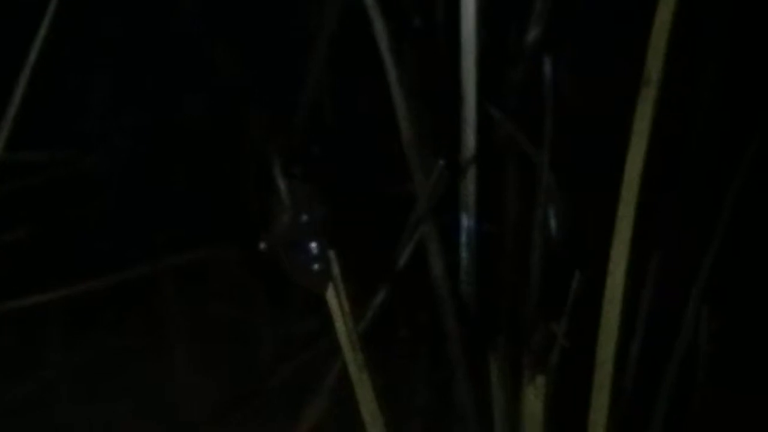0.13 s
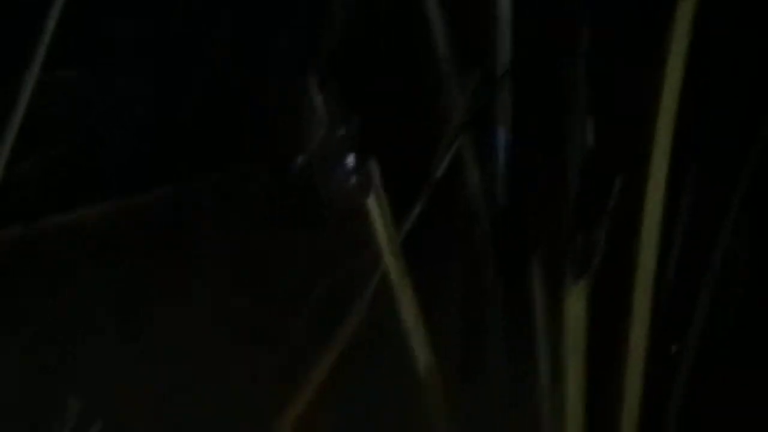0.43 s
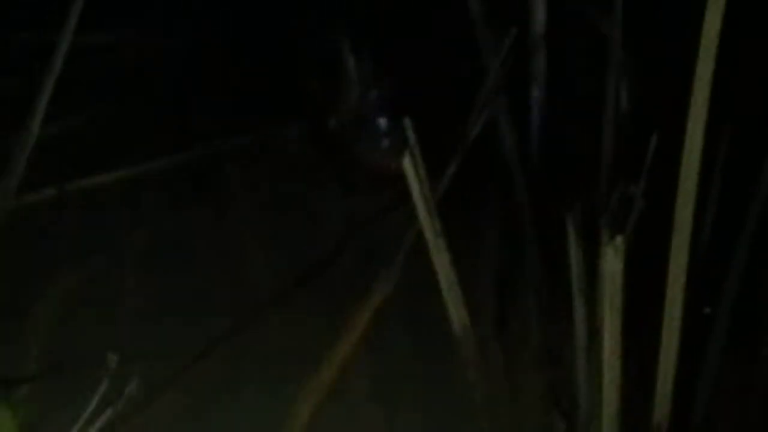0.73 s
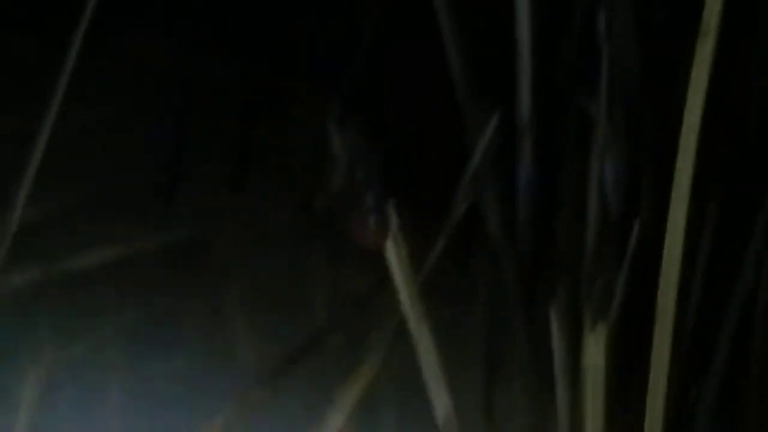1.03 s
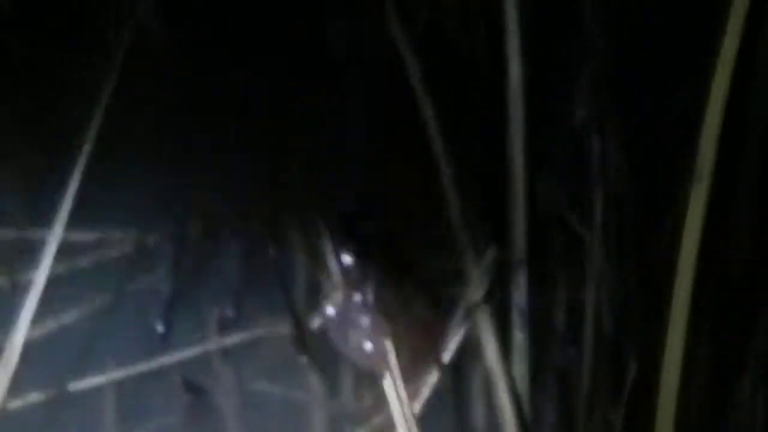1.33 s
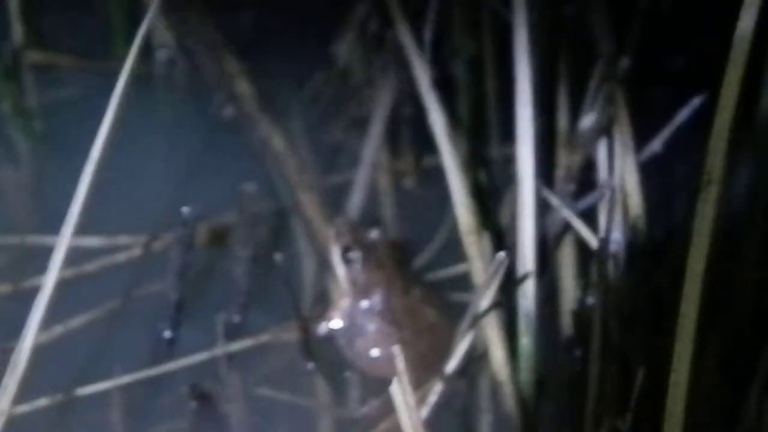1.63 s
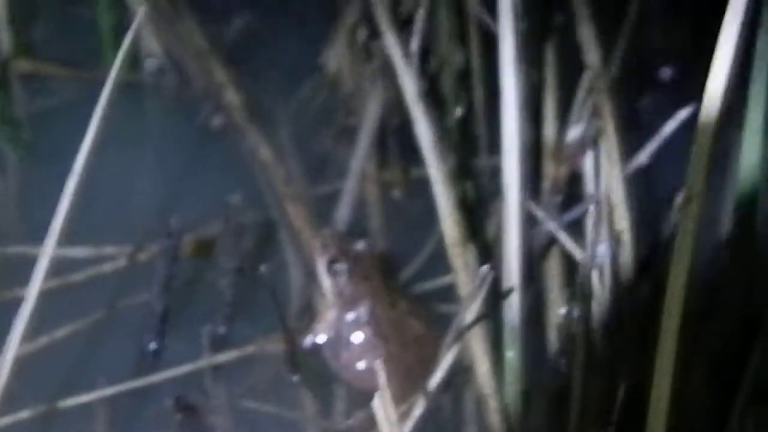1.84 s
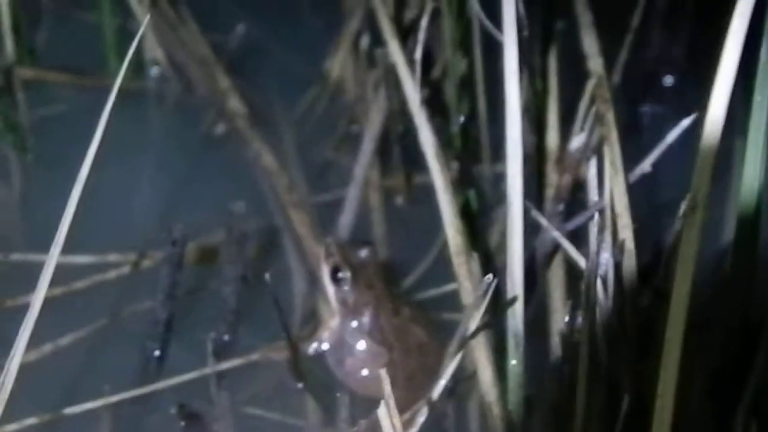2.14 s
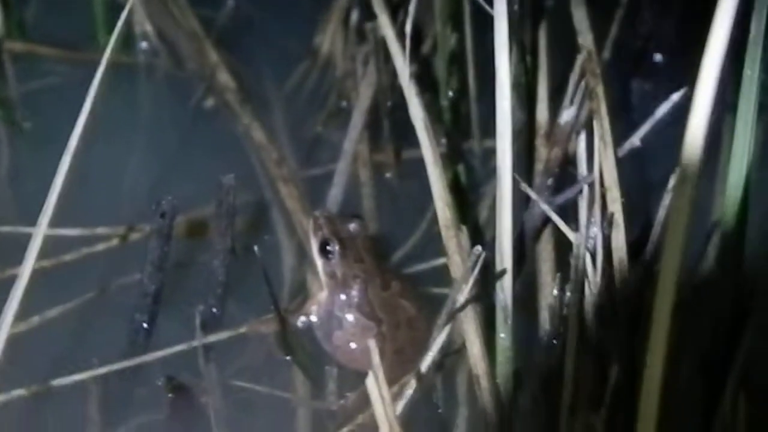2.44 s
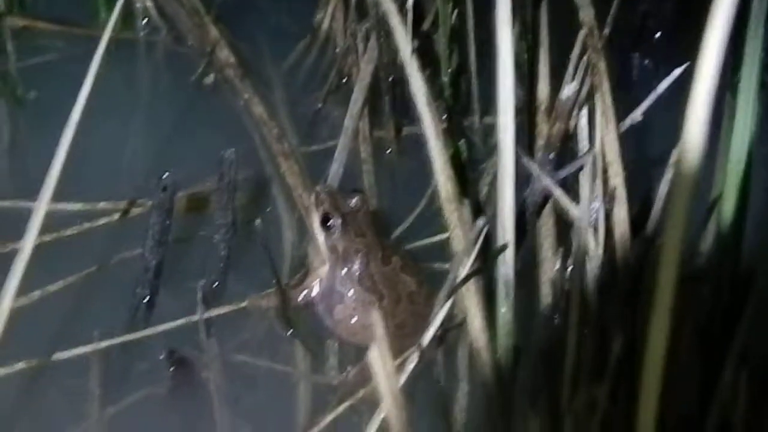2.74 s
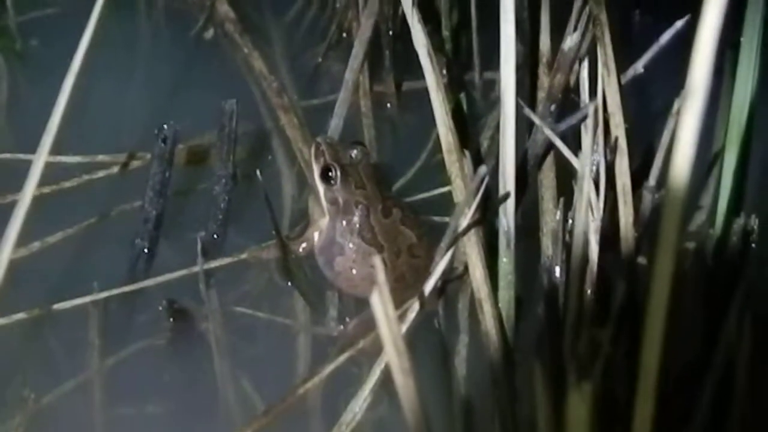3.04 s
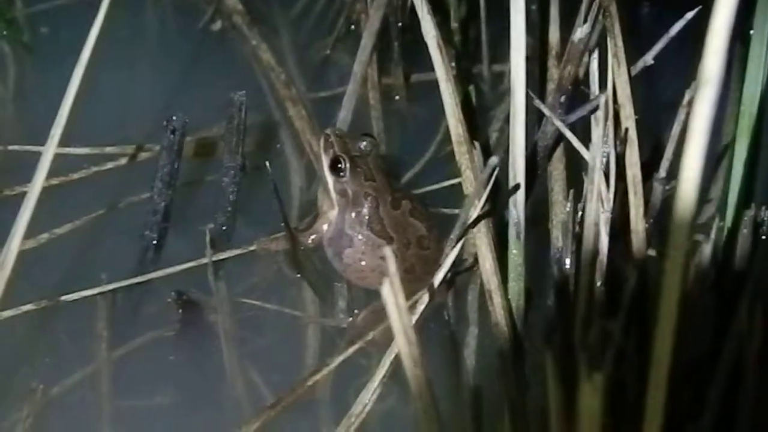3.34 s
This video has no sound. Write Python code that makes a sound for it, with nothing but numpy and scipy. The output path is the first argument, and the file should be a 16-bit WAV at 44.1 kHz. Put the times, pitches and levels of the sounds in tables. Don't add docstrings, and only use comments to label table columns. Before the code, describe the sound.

Close frogs trade rising, ratchet-like creaks at a night pond, with far calls and thin cricket chirring

```python
import sys
import numpy as np
from scipy import signal
from scipy.fft import rfft, irfft
from scipy.io import wavfile
from scipy.ndimage import uniform_filter1d

SR = 44100
rng = np.random.default_rng(int(sys.argv[2]) if len(sys.argv) > 2 else 0)


def volts_from_db(level):
    exponent = np.asarray(level, float) / 20
    return 10 ** exponent


def to_wav(s):
    ch = np.atleast_2d(s).T
    pcm = np.round(np.clip(ch, -1, 1) * 32767)
    wavfile.write(sys.argv[1], SR, pcm.astype(np.int16))


N = 153027

# [f/Hz, level/dB]
HUM_MID = [(22, -49), (50, -11), (91, 0), (147, -3.5), (257, -16), (302, -14.5), (409, -5.5), (704, -20.5),
           (1100, -24)]
HUM_SIDE = [(13, -40), (22, -23), (97, 4), (274, -5.5), (402, 2.5), (600, -4.5), (1000, -9), (1300, -40),
            (2200, -120)]
HISS_MID = [(800, -11.5), (1300, 2), (1800, -5.5), (2150, -2.5), (3500, -6), (3900, -8), (5300, -19),
            (15700, -26)]
HISS_SIDE = [(800, -11), (1300, -3), (1800, -5), (3300, -5.5), (3900, -11.5), (5300, -15), (8000, -20),
             (15700, -23)]
# [f/Hz, width/Hz, level/dB]
TONES = [
    (95.85, 4.4, -55.5),
    (414.9, 7.8, -59.5),
    (561.7, 6.7, -68.5),
    (15735, 3.6, -89),
]
# [t/s, delay/ms]
CHIRP_DRIFT = [(.4, 15.6), (.8, 15.2), (1.201, 19), (1.6, 12.2), (2.0, 14.4), (2.4, 16.8), (2.8, 17.7),
               (3.2, 22)]
# [t/s, level/dB]
CROWD_SWELL = [(.1, -7), (.4, -3.5), (.7, 0.5), (1.05, -2.5), (1.4, -0.5), (1.8, -2.5), (2.2, 1),
               (2.6, -3.5), (3.0, 0.5), (3.4, -4)]
# [t/s, length/s, start f/Hz, end f/Hz, level/dB]
FAR_CALLS = [(0.102, 0.27, 2430, 2520, -55), (0.098, 0.17, 2930, 3150, -71), (0.263, .3, 2690, 2910, -49.5),
             (.78, .2, 3060, 3260, -46.5), (0.993, 0.11, 2580, 2775, -45), (0.968, .25, 3210, 2985, -49),
             (1.534, .3, 2375, 2540, -51), (1.55, .24, 2590, 2890, -52), (1.78, 0.29, 2800, 3250, -55.5),
             (2.44, 0.17, 2940, 3254, -47), (2.473, 0.17, 2800, 2990, -40), (2.65, 0.21, 2870, 3270, -55),
             (2.893, .2, 2690, 2800, -46), (3.059, .14, 2734, 2760, -52.5), (3.2, 0.23, 2950, 3150, -55),
             (3.33, 0.13, 2740, 2840, -53)]
# [t/s, length/s, start f/Hz, end f/Hz, level/dB]
WHISTLES = [
    (.79, 0.1405, 3060, 3230, -42),
    (2.455, 0.18, 2940, 3250, -45.5),
    (2.66, .15, 2950, 3200, -44.5),
    (.27, .2, 2900, 2920, -54.5),
    (1.53, .2, 2370, 2480, -54),
    (3.36, .11, 3300, 2100, -50.5),
    (2.462, 0.023, 2930, 2980, -36.5),
]
# [t/s of first pulse, frog index]
CALL_STARTS = [
    (.1474, 1),
    (.3804, 0),
    (1.1086, 1),
    (1.8364, 0),
    (2.5661, 1),
    (3.2716, 0),
    (.5147, 2),
    (2.1647, 2),
]
# [pulse number, gap to next/ms]
GAPS_1 = [(0, 31.98), (3, 30.28), (4, 23.63)]
GAPS_2 = [(0, 22.86), (7, 22.91), (12, 26.05), (16, 30.97), (19, 35.27), (21, 34.62), (22, 38.91)]
GAPS_3 = [(0, 19.76), (8, 20.94), (13, 23.7), (18, 27.58), (21, 30.7), (24, 30.56), (25, 26.94)]
GAPS_4 = [(0, 23.11), (7, 22.95), (12, 25.76), (16, 30.27), (19, 34.67), (22, 35.48)]
GAPS_5 = [(0, 19.56), (6, 20.26), (11, 22.72), (17, 27.71), (22, 31.84), (24, 29.19)]
GAPS_6 = [(0, 23.45), (3, 23.04), (7, 22.97)]
GAPS_7 = [(0, 25.8), (4, 31), (9, 31.9)]
GAPS_8 = [(0, 27.6), (3, 32.2), (8, 32.8)]
# [t/s, ring f/Hz, effort level/dB]
SAC_1 = [(.147, 3210, -18.5), (.211, 3310, -16.5), (.272, 3285, -15), (.296, 3290, -19.5)]
SAC_2 = [(.38, 2270, -36), (.472, 2420, -30.5), (.587, 2550, -23), (.688, 2620, -19), (.837, 2804, -17),
         (.975, 2845, -19.5), (1.014, 2930, -29.5)]
SAC_3 = [(1.108, 2610, -37.5), (1.2, 2650, -32), (1.271, 2770, -26.5), (1.358, 2815, -21.5),
         (1.48, 3050, -18.5), (1.593, 3150, -16), (1.716, 3260, -16.5), (1.743, 3210, -19)]
SAC_4 = [(1.836, 2340, -33.5), (1.929, 2370, -27.5), (2.044, 2558, -22), (2.144, 2630, -19.5),
         (2.29, 2785, -17.5), (2.427, 2850, -19.5), (2.464, 2910, -21)]
SAC_5 = [(2.566, 2640, -35.5), (2.685, 2790, -26), (2.769, 2894, -24), (2.888, 3047, -19),
         (2.996, 3180, -19), (3.119, 3247, -16.5), (3.149, 3330, -16.5), (3.179, 3253, -18.5)]
SAC_6 = [(3.272, 2280, -33.5), (3.318, 2350, -29), (3.388, 2464, -26.5), (3.433, 2446, -24),
         (3.457, 2535, -22)]
SAC_7 = [(.52, 3080, -35.5), (.8, 3230, -32)]
SAC_8 = [(2.17, 3030, -34), (2.44, 3300, -38)]
# [rise/ms, knock f/Hz, knock level/dB, upper f ratio, upper level/dB, left-right/dB, side echo/dB]
FROGS = [
    (1.96, 1490, -15, 1.46, -30, 4, -33),
    (2.027, 1702, -16, 1.21, -27.5, 0.5, -36),
    (1.59, 2000, -12, 1.17, -16, -1, -27),
]
# [f/Hz, decay/ms]
RING_DECAY = [
    [(2300, 0.84), (2580, 1.78), (2700, 0.96), (2830, 0.71)],
    [(2650, .7), (2830, 1.5), (3100, 1.5), (3300, 0.77)],
    [(3000, 2.9), (3300, 1.8)],
]
# [tail/ms, tail level/dB, under f ratio, under level/dB]
TAILS = [
    (4.5, -15, .76, -25),
    (3.5, -23, .7, -30),
    (4.5, -20, .7, -30),
]
KNOCK_DECAY_MS = (.65, 1.0, .9)
# [f/Hz, width/Hz, depth/dB]
SPECTRUM_DIPS = [
    (3698, 99, -12.5),
    (5017, 114, -10.5),
    (2090, 146, -2),
    (3426, 104, -1),
]

FAR_T60_S = 0.14


def evened(x):
    return x / np.sqrt(np.mean(x ** 2) + 1e-20)


def add(mix, start_s, sound):
    part = mix[max(round(start_s * SR), 0):][:len(sound)]
    part += sound[:len(part)]


def stereo(mid, side):
    return np.array([mid + side, mid - side])


def pan(x, left_right_db):
    return x * volts_from_db([[left_right_db / 2], [-left_right_db / 2]])


def unit_time(length_s):
    return np.arange(0, length_s, 1 / SR) / length_s


def glide(start_hz, end_hz, u):
    return start_hz + (end_hz - start_hz) * np.sin(np.pi / 2 * u)


def resonate(x, hz, width_hz):
    turn = np.exp(2j * np.pi * np.cumsum(hz * np.ones(len(x))) / SR)
    r = np.exp(-np.pi * width_hz / SR)
    return 2 * (turn * signal.lfilter([1 - r], [1, -r], x / turn)).real


def scatter(x, t60_s):
    t = np.arange(SR // 3) / SR
    taps = rng.choice([-1., 1.], (2, len(t))) * (rng.random((2, len(t))) < .05)
    taps = taps * volts_from_db(-60 * t / t60_s) * (t > .003)
    taps = taps / np.linalg.norm(taps, axis=1)[:, None]
    return signal.fftconvolve(x[None], taps, axes=1)[:, :N]


def noise(colour, patchy_db):
    a, b, patches = rng.standard_normal((N // 256 + 5, 513, 3)).T
    patches = uniform_filter1d(patches, size=8, axis=0)
    patches = evened(uniform_filter1d(patches, size=12, axis=1))
    spectrum = (a + 1j * b) * volts_from_db(patchy_db * patches)
    patchy = signal.istft(spectrum, nperseg=1024, noverlap=768)[1][:N]
    f, db = np.transpose(colour)
    hz = np.fft.rfftfreq(N, 1 / SR)
    colour_db = np.interp(np.log(hz + 1), np.log(f + 1), db, -99, -99)
    return evened(irfft(rfft(patchy) * volts_from_db(colour_db), N))


def night():
    tones = np.zeros(N)
    for hz, width_hz, db in TONES:
        tone = resonate(rng.standard_normal(N), hz, width_hz)
        tones += volts_from_db(db) * evened(resonate(tone, hz, 3 * width_hz))
    mid = volts_from_db(-45.5) * noise(HUM_MID, patchy_db=1.0) + volts_from_db(-53) * noise(HISS_MID, patchy_db=1.82)
    side = volts_from_db(-55.5) * noise(HUM_SIDE, patchy_db=1.0) + volts_from_db(-54) * noise(HISS_SIDE, patchy_db=-0.5)
    return stereo(mid + tones, side)


def cricket():
    chirps_per_s, chirp_s, lead_s = 26.5, 0.02315, .01
    top_hz, fall_hz, bend, pitch_spread = 4679, 763, 2.3, .006
    fade_db, spread_db = -7, 1.6
    swarm_hz, swarm_width_hz = 4705, 980

    trill = np.zeros(N)
    beats_s = np.arange(4, chirps_per_s * N / SR) / chirps_per_s
    delays_s = np.interp(beats_s, *np.transpose(CHIRP_DRIFT)) / 1000
    u = unit_time(chirp_s)
    swell = np.sin(np.pi * u ** 0.98) * volts_from_db(fade_db * u ** 2)
    for t, (a, b, c) in zip(beats_s + delays_s - lead_s, rng.standard_normal((len(beats_s), 3))):
        hz = (top_hz - fall_hz * u ** bend) * (1 + pitch_spread * a)
        chirp = swell * np.sin(2 * np.pi * (np.cumsum(hz) / SR + c))
        add(trill, t + .0012 * b, volts_from_db(spread_db * c) * chirp)
    trill = volts_from_db(-55.5) * evened(trill)

    swarm = rng.standard_normal(N)
    for _ in range(3):
        swarm = resonate(swarm, swarm_hz, swarm_width_hz)
    a, b = scatter(trill + volts_from_db(-53) * evened(swarm), 0.12)
    return pan(trill, 2.5) + volts_from_db(-9.5) * stereo(a, 0.77 * b)


def far_call(length_s, start_hz, end_hz, db, phase):
    clicks_per_s, slowing, jitter, width_hz, half_db = 80, .3, .25, 116, -39
    u = unit_time(length_s)
    rate_hz = clicks_per_s * (1 - slowing * u) * (1 + jitter * np.sin(40 * u + 9 * phase))
    clicks = np.diff(np.floor(phase + np.cumsum(rate_hz) / SR), prepend=0)
    hz = glide(start_hz, end_hz, u)
    ring = resonate(resonate(clicks, hz, width_hz), hz, width_hz)
    ring = resonate(ring, hz, 2 * width_hz)
    half = resonate(resonate(clicks, hz / 2, 2 * width_hz), hz / 2, 2 * width_hz)
    swell = np.sin(np.pi * u ** 0.72) ** 0.22
    return volts_from_db(db) * swell * (evened(ring) + volts_from_db(half_db) * evened(half))


def far_frogs():
    calls, crowd = np.zeros(N), np.zeros(N)
    for (t, *call), phase in zip(FAR_CALLS, rng.random(len(FAR_CALLS))):
        add(calls, t, volts_from_db(-3.5) * far_call(*call, phase))
    for t, (p, q, phase) in zip(np.linspace(-.3, N / SR, num=36), rng.random((36, 3))):
        low_hz = 2480.4 + 471 * p
        add(crowd, t, far_call(.4, low_hz, 1.12 * low_hz, -6 * q, phase))
    swell_db = np.interp(np.arange(N) / SR, *np.transpose(CROWD_SWELL))
    crowd = evened(crowd) * volts_from_db(swell_db)
    a, b = scatter(calls, FAR_T60_S) + volts_from_db(-46.5) * scatter(crowd, 2 * FAR_T60_S)
    return stereo(a + volts_from_db(-12) * calls, volts_from_db(-10.5) * b + 0.027 * a)


def whistles():
    waver_hz, flutter_db = 14, 1.8
    line = np.zeros(N)
    for t, length_s, start_hz, end_hz, db in WHISTLES:
        u = unit_time(length_s)
        waver, flutter = (evened(uniform_filter1d(v, size=500)[:len(u)])
                          for v in rng.standard_normal((9000, 2)).T)
        hz = glide(start_hz, end_hz, u) + waver_hz * waver
        tone = np.sin(np.pi * u) ** 0.46 * np.sin(2 * np.pi * np.cumsum(hz) / SR)
        add(line, t, volts_from_db(db + 2 + flutter_db * flutter) * tone)
    a, b = scatter(line, FAR_T60_S)
    return pan(line, -2) + volts_from_db(-10) * stereo(a, .3 * b)


def pulse(hz, rise_ms, decay_ms, phase):
    sag = 0.017
    ms = np.arange(700) / SR * 1000
    u = ms / rise_ms
    rise = np.sin(np.pi / 2 * np.minimum(u, 1)) ** 2
    fall = 1 / np.cosh((ms - rise_ms) / decay_ms)
    turns = hz * np.cumsum(1 - sag * (u - 1).clip(-1, 4)) / SR + phase
    return np.where(u < 1, rise, fall) * np.sin(2 * np.pi * turns)


def near_call(voice, start_s, frog, gaps, sac):
    peak_db, pulse_spread_db, bite_spread_db = -1.5, .5, 4
    knock_steadiness, upper_decay_ms = 0.11, 0.3
    rise_ms, knock_hz, knock_db, upper, upper_db = FROGS[frog][:5]
    tail_ms, tail_db, under, under_db = TAILS[frog]
    number, gap_ms = np.transpose(gaps)
    gaps_ms = np.interp(np.arange(number[-1] + 1), number, gap_ms)
    times_s = start_s + np.r_[0, np.cumsum(gaps_ms)] / 1000
    sac_s, sac_hz, sac_db = np.transpose(sac)
    for t, (p, q, z) in zip(times_s, rng.standard_normal((len(times_s), 3))):
        hz, effort_db = np.interp(t, sac_s, sac_hz), np.interp(t, sac_s, sac_db)
        decay_ms = np.interp(hz, *np.transpose(RING_DECAY[frog]))
        creak = pulse(hz, rise_ms, decay_ms, 0)
        creak += volts_from_db(tail_db) * pulse(hz, 1.5 * rise_ms, tail_ms, 0)
        creak += volts_from_db(under_db) * pulse(under * hz, rise_ms, .8, q)
        knock = pulse(knock_hz * (hz / sac_hz[-1]) ** 0.37, 0.48 * rise_ms, KNOCK_DECAY_MS[frog], p)
        creak += volts_from_db(knock_db + z - knock_steadiness * (effort_db + 16.5)) * knock
        bite = pulse(upper * hz, 0.64 * rise_ms, upper_decay_ms, q)
        creak += volts_from_db(upper_db + bite_spread_db * p) * bite
        add(voice, t - 1.121 * rise_ms / 1000, volts_from_db(effort_db + peak_db + pulse_spread_db * z) * creak)


def near_frogs():
    lag_ms, echo_db, echo_t60_s = .027, -15, 0.11
    all_gaps = (GAPS_1, GAPS_2, GAPS_3, GAPS_4, GAPS_5, GAPS_6, GAPS_7, GAPS_8)
    all_sacs = (SAC_1, SAC_2, SAC_3, SAC_4, SAC_5, SAC_6, SAC_7, SAC_8)
    voices = np.zeros((len(FROGS), N))
    for (start_s, frog), gaps, sac in zip(CALL_STARTS, all_gaps, all_sacs):
        near_call(voices[frog], start_s, frog, gaps, sac)
    out = np.zeros((2, N))
    for voice, (*_, left_right_db, side_echo_db) in zip(voices, FROGS):
        late = np.interp(np.arange(N) - lag_ms * SR / 1000, np.arange(N), voice)
        a, b = scatter(voice, echo_t60_s)
        out += pan(np.array([voice, late]), left_right_db)
        out += stereo(volts_from_db(echo_db) * a, volts_from_db(side_echo_db) * b)
    return out


def scene():
    return night() + cricket() + far_frogs() + whistles() + near_frogs()


def low_pass(x):
    return signal.sosfilt(signal.butter(12, 16230, fs=SR, output="sos"), x)


def record(dry):
    start_s, lead_in_s, lead_in_db, edge_hz = 0.1342, .021, -26, 15780
    hz, t = np.fft.rfftfreq(N, 1 / SR), np.arange(N) / SR
    colour_db = -30 * (hz > edge_hz)
    for f, width_hz, db in SPECTRUM_DIPS:
        colour_db = colour_db + db * np.exp(-((hz - f) / width_hz) ** 2)
    heard = irfft(rfft(dry, axis=1) * volts_from_db(colour_db), N, axis=1)
    opening_s = [start_s - lead_in_s, start_s - .004, start_s + 0.0022]
    opening = np.interp(t, opening_s, [0, volts_from_db(lead_in_db), 1])
    return low_pass(heard * opening)


dry = scene()
out = record(dry)
to_wav(out)
```